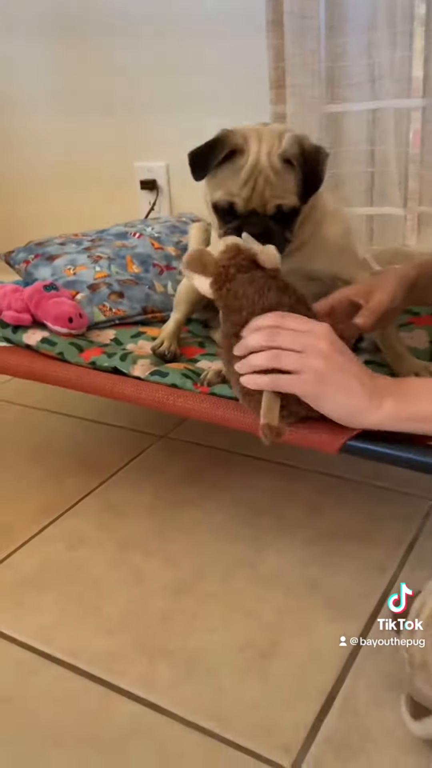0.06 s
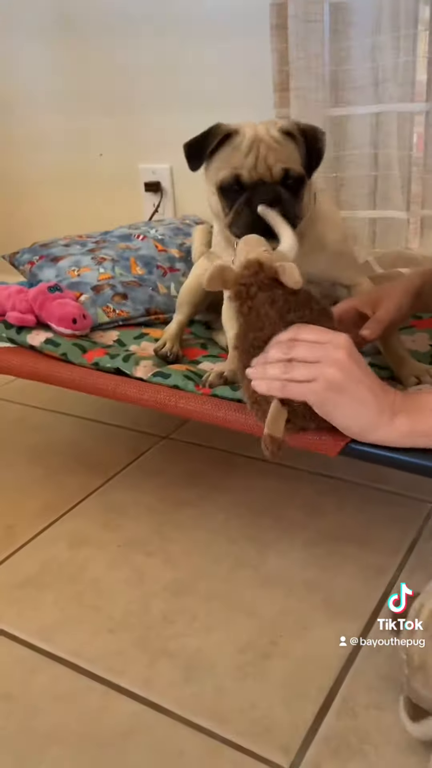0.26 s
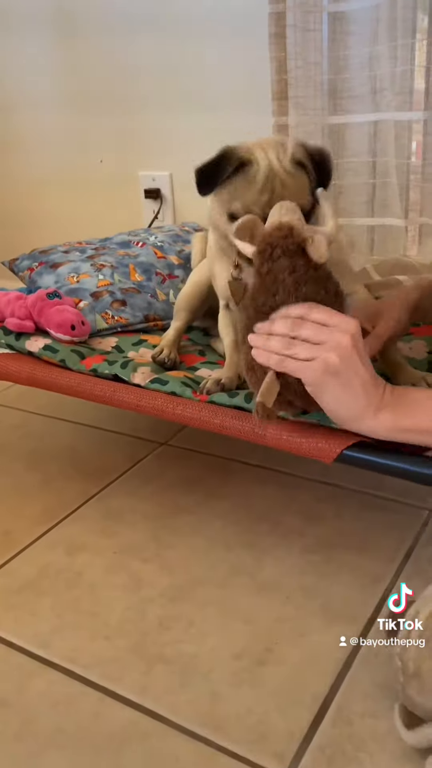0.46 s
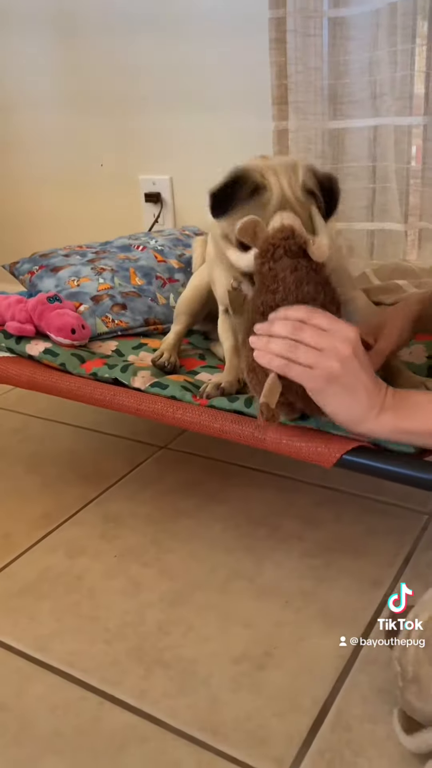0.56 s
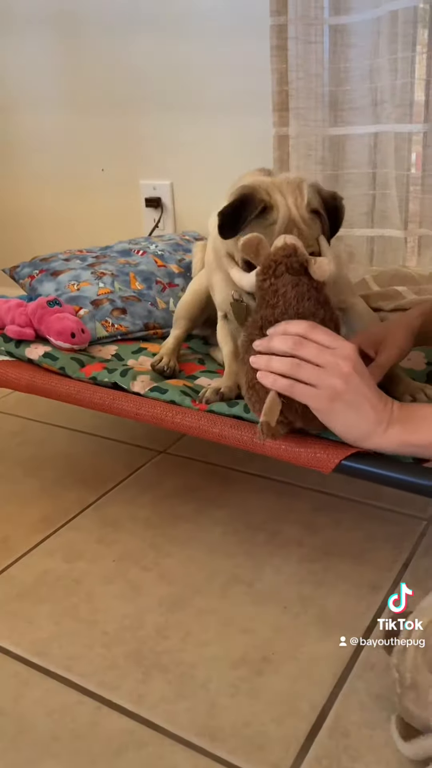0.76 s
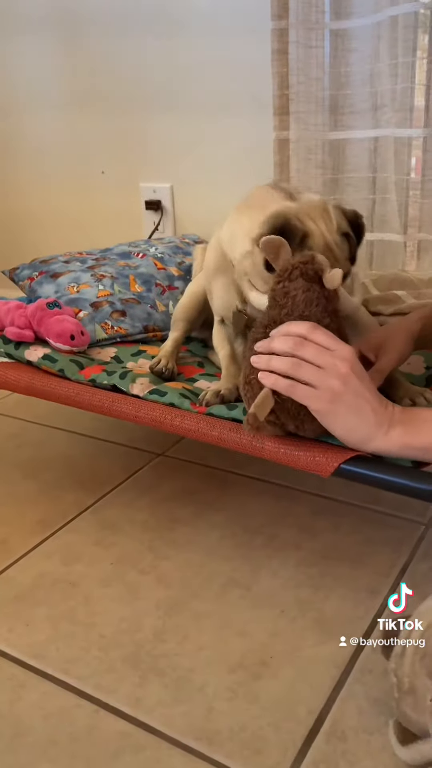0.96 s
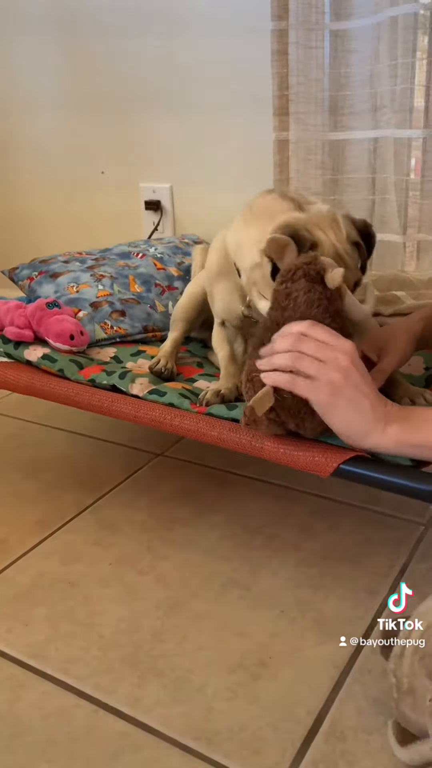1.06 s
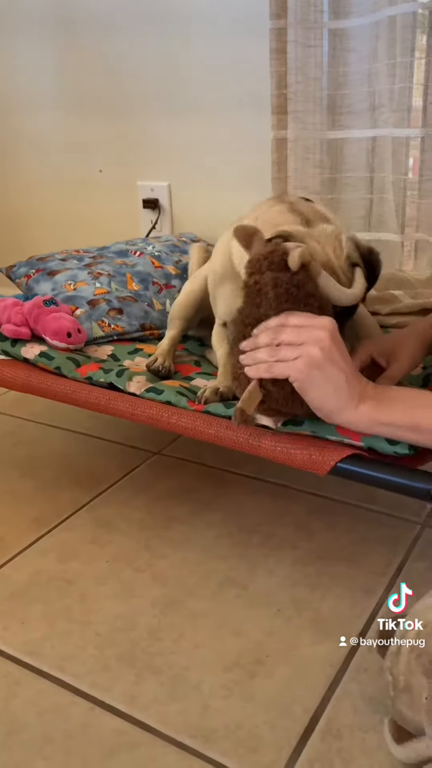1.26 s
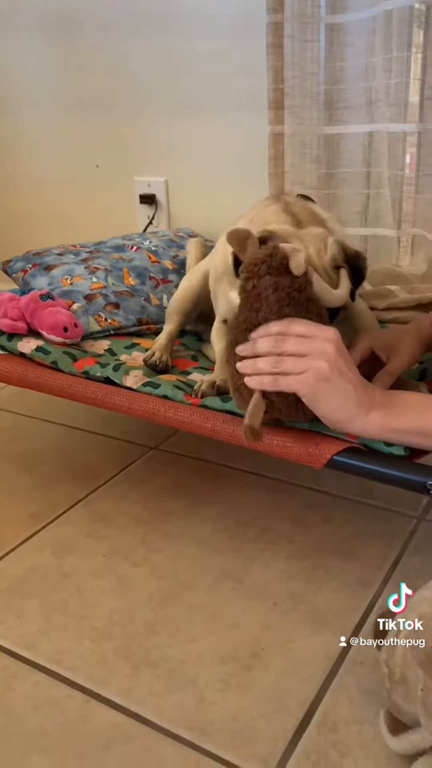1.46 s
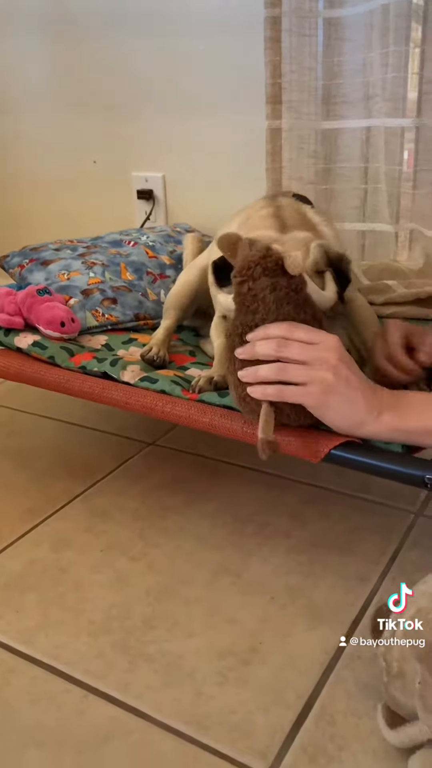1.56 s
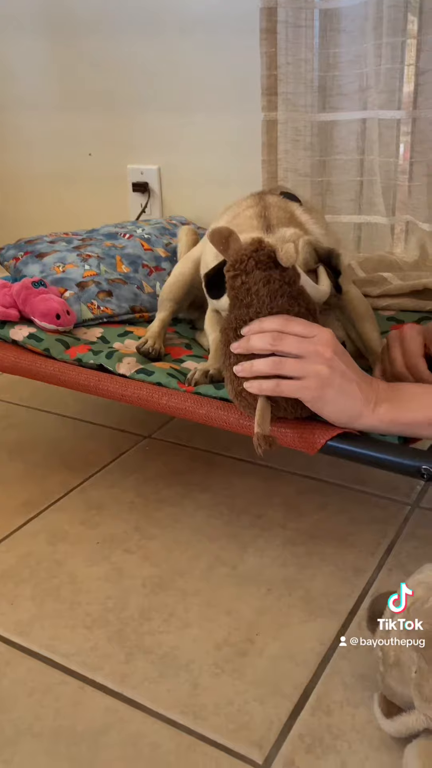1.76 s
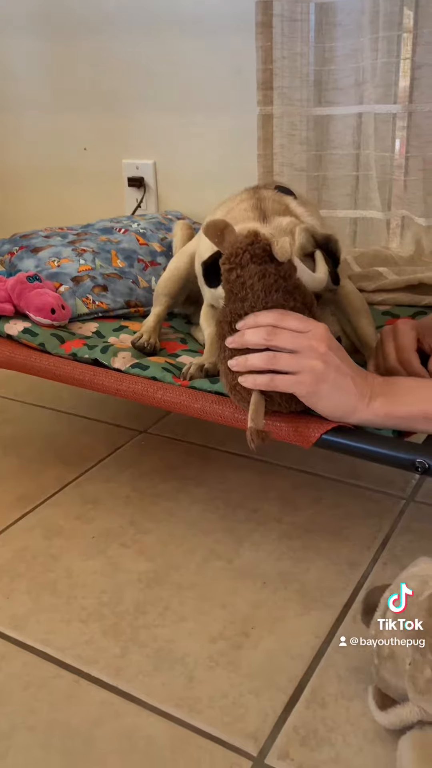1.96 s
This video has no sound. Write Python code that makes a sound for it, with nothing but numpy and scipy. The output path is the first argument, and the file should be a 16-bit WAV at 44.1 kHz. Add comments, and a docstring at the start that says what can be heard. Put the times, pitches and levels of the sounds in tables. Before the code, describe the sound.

A plush squeaky toy is squeezed nearby in a tiled room. A faint hiss of air leads to a short, bright squeak at about 0.25 seconds, rising then sagging. Near 0.6 seconds the squeaker refills with a tiny chirp and soft pop. A second squeak comes at 1.1 seconds, then faint air and a soft knock around 1.6. Quiet fabric rustles and dull nudges sit over a low hum.

```python
"""A plush dog toy squeezed in a tiled room

A hand squeezes the toy over a dog's cot, about a metre away. Air hisses through the squeaker, then
drives its reed: two bright squeaks that rise and sag in pitch, and a tiny chirp as the bulb refills.
The elastic bulb pops back with a soft knock. Fabric rustles and the cot is nudged over a low hum."""
import sys
import numpy as np
from scipy import signal
from scipy.fft import rfft, irfft
from scipy.io import wavfile

SR = 44100
rng = np.random.default_rng(int(sys.argv[2]) if len(sys.argv) > 2 else 0)


def to_wav(sig):
    """Store sig (one row per channel, or 1-D mono) as 16-bit WAV at the path in sys.argv[1].

    Samples outside -1..1 are clipped; the rate is SR.
    """
    pcm = np.clip(np.atleast_2d(sig), -1, 1) * 32767
    pcm = np.round(pcm).astype(np.int16)
    wavfile.write(sys.argv[1], SR, pcm.T)  # frames by channels


N = 88200
T = np.arange(N) / SR
LEFT_RIGHT = np.array([[1], [-1]])

# Spectrum of the quiet house: f/Hz, level/dB
HOUSE_SPECTRUM = [(25, -22), (70, -5), (130, -5), (220, -17.5), (600, -30), (1500, -44), (5000, -41.5),
                  (15000, -46.5)]
# Course of the rumble: t/s, level/dB
RUMBLE_LEVELS = [(0, -100), (.3, -79), (.6, -73), (.9, -66), (1.08, -60.5), (1.3, -74), (1.45, -60),
                 (1.65, -66), (2, -57.5)]
# Course of the hum: t/s, f/Hz, level/dB
HUM_CURVE = [(.03, 93.5, -88), (.1, 100.5, -64.5), (.32, 99.2, -58.5), (.52, 101.6, -58), (.6, 95.1, -68.5),
             (.82, 96.4, -71.5), (.88, 95.8, -60), (1.13, 100.1, -60.5), (1.2, 98.7, -66.5),
             (1.27, 108, -63), (1.38, 84.3, -60), (1.46, 85.4, -64), (1.7, 82, -63), (2, 69.7, -69.5)]
# Nudges of the cot: start/s, attack/s, hold/s, release/s, level/dB, f/Hz
COT_NUDGES = [(0.611, 0.01, 0.093, .14, -55.5, 147.4), (0.734, 0.013, 0.016, .08, -54.5, 98),
              (0.942, 0.009, 0.19, .2, -58, 95), (1.638, 0.021, 0.244, .3, -65, 139.6)]
# Rubs of plush on bedding, and the fingers' grip: start/s, attack/s, hold/s, release/s, level/dB
FABRIC_RUBS = [(.24, 0.018, .04, .08, -69.5), (.62, 0.03, 0.069, .12, -55.5),
               (0.928, 0.018, 0.063, 0.16, -58.5), (1.14, 0.023, 0.13, 0.34, -64.5),
               (1.42, .04, .1, 0.19, -65.5), (1.64, 0.024, 0.046, 0.11, -64)]
FINGER_GRIP = (.051, .002, .015, .2, -65)
# Their friction spectra: f/Hz, level/dB
RUB_SPECTRUM = [(60, -7), (150, 4), (300, 2), (700, -9.5), (1100, -27), (2500, -33), (5000, -33.5),
                (14000, -44)]
GRIP_SPECTRUM = [(150, -6), (500, -5), (850, 4), (1200, -3), (2000, -15), (2800, -9), (5000, -21.5),
                 (14000, -35)]
# The bulb pops back: t/s, level/dB
BULB_POPS = [(0.5732, -35.5), (1.5796, -32.5)]
# Modes of the bulb in its stuffing: f/Hz, level before filtering/dB, T60/s
BULB_MODES = [(287, -9.5, 0.057), (520, -16, .025), (820, -13.5, 0.03), (1112, 10, 0.0067),
              (1130, -11.5, 0.006)]
# Airflow through the squeaker: start/s, attack/s, hold/s, release/s, level/dB
AIR_PUFFS = [(0.054, 0.036, 0.26, 0.023, -57), (1.42, 0.01, 0.019, 0.21, -64),
             (1.553, .01, 0.038, 0.15, -74)]
# The reed snaps open: t/s, level/dB
REED_SNAPS = [(0.2365, -28.5), (1.0924, -28)]
# Spectra of the airflow and the snaps: f/Hz, level/dB
AIR_SPECTRUM = [(300, -22.5), (1100, -6.5), (1700, -1.5), (2500, -8), (4500, 4), (5900, -5.5), (7500, 1),
                (9500, -1), (12000, -7.5), (14500, -4), (16000, -17)]
SNAP_SPECTRUM = [(300, -33), (900, -15.5), (1700, 2.5), (3000, -12), (5500, -7.5), (8000, 1), (11000, -12),
                 (15000, -16)]
# Course of the reed in each squeak and in the refill chirp: t/s, f/Hz, level/dB
SQUEAK_CURVES = [
    [(.227, 1224, -42.5), (.236, 1220, -32.5), (.2374, 1224, -18), (.246, 1258, -17.5), (.256, 1361, -15),
     (.263, 1477, -19), (.272, 1455, -15.5), (.278, 1163, -21.5), (.29, 1079, -26.5), (.298, 979, -42)],
    [(1.082, 1205, -51), (1.0908, 1210, -31.5), (1.0928, 1209, -21), (1.103, 1233, -19.5),
     (1.114, 1273, -18), (1.125, 1246, -20), (1.136, 1155, -20), (1.151, 1118, -22.5), (1.157, 1014, -34.5),
     (1.163, 948, -50.5)],
]
CHIRP_CURVE = [(.563, 929.2, -59), (.5722, 945.5, -43), (.5738, 1062, -26.5), (.579, 961, -30),
               (.581, 871, -43.5)]
# Reed spectra through the plush, blown out (one per squeak) and sucked in: f/Hz, level/dB
BLOWN_SPECTRA = [
    [(500, -31.5), (950, -4), (1200, -8.5), (1500, -9), (1800, -15), (2600, -12), (3700, -13), (4900, -11),
     (6200, -8.5), (7400, -1), (8700, -4), (9800, -12), (11500, -46.5), (14300, -29), (16000, -47)],
    [(500, -40.5), (950, -5.5), (1170, -4), (1500, -13), (2450, -11.5), (3700, -13.5), (4950, -9),
     (6200, -10.5), (7400, -1.5), (8700, -1.5), (9800, -10), (11500, -35.5), (14300, -22.5), (16000, -41)],
]
SUCKED_SPECTRUM = [(500, -14.5), (1000, -4), (2050, -7.5), (3100, -14), (4500, -14), (6200, -25),
                   (7400, -8), (8400, 0), (10000, -5.5), (12000, -19), (15000, -19.5)]
# Reverberation by band: f/Hz, T60/s, level/dB, left-right coherence (0-1)
ROOM_BANDS = [(154, 0.61, -5.5, .9), (613.2, 0.17, -0.5, 1), (1250, 0.5, -2, 0.4), (2500, 0.54, -0.5, 0.6),
              (4780, 0.42, -1, 0), (6700, 0.37, -3.5, 1), (8957, 0.33, -9, .95), (13400, .31, -9.5, 1)]
# Phase between the two microphone ports: f/Hz, lead of the left/rad
PORT_PHASES = [(400, 0), (1200, -.9), (2700, .4), (4900, 3.2), (6200, 4.0), (7400, 5.4), (8600, 6.25),
               (9900, 7.3), (12000, 9.5), (14000, 11.8)]


def undb(db):
    """Amplitude ratio of a level in decibels."""
    return 10 ** (np.asarray(db) / 20)


def unit(x):
    """Normalisation to an rms of 1."""
    return x / np.sqrt(np.mean(x ** 2))


def on_log(hz, points):
    """Interpolation of (f/Hz, value) points on a logarithmic frequency axis."""
    f, values = np.array(points).T
    return np.interp(np.log(hz + 1e-9), np.log(f), values)


def noise(spectrum):
    """Spectral shaping of white noise, at unit rms."""
    gain = undb(on_log(np.fft.rfftfreq(N, 1 / SR), spectrum))
    return unit(irfft(rfft(rng.standard_normal(N)) * gain, N))


def ringing_noise(hz, width_hz):
    """Response of one steep resonance to random forcing."""
    detuning = (np.fft.rfftfreq(N, 1 / SR) - hz) / width_hz
    return unit(irfft(rfft(rng.standard_normal(N)) / (1 + (2 * detuning) ** 2), N))


def wander(rate_hz):
    """Random modulation: interpolated Gaussian values with a spread near 1."""
    return 1.2 * np.interp(T * rate_hz, np.arange(N), rng.standard_normal(N))


def decay(age, t60):
    """Exponential damping by 60 dB in each t60."""
    return np.exp(-np.log(1000) * age / t60)


def swell(start, attack, hold, release, db):
    """Envelope with a linear attack, a hold and an exponential release."""
    since_hold = np.maximum(T - start - attack - hold, 0)
    return undb(db) * np.clip((T - start) / attack, 0, 1) * decay(since_hold, release)


def house():
    """Partly coherent background noise: a common part plus a weaker part in antiphase."""
    return undb(-68.5) * (noise(HOUSE_SPECTRUM) + 0.39 * noise(HOUSE_SPECTRUM) * LEFT_RIGHT)


def rumble(centre_hz=49, spread_hz=3):
    """Random frequency and amplitude modulation spread a deep tone into a narrow band."""
    phase = 2 * np.pi * np.cumsum(centre_hz + spread_hz * wander(35)) / SR
    level_db = np.interp(T, *np.array(RUMBLE_LEVELS).T) + 1.5 * wander(10)
    return np.sqrt(2) * np.sin(phase) * undb(level_db)


def hum():
    """Slow modulation makes a low sinusoid waver in pitch and level."""
    times, hz, db = np.array(HUM_CURVE).T
    pitch = np.interp(T, times, hz) * (1 + 0.0099 * wander(4.7))
    phase = 2 * np.pi * np.cumsum(pitch) / SR
    return np.sqrt(2) * np.sin(phase) * undb(np.interp(T, times, db) + 3.5 * wander(12))


def cot():
    """Forced vibration: each nudge excites one dull resonance of the cot."""
    return sum(swell(*envelope) * ringing_noise(hz, width_hz=47) for *envelope, hz in COT_NUDGES)


def fabric():
    """Uneven friction of plush on bedding and of fingers on plush radiates noise."""
    rubs = noise(RUB_SPECTRUM) * sum(swell(*rub) for rub in FABRIC_RUBS)
    grip = noise(GRIP_SPECTRUM) * swell(*FINGER_GRIP)
    return (rubs + grip) * undb(2.5 * wander(44))


def bulb(contact_s=0.00095, low_cut_hz=173):
    """The bulb springs back and rings in damped modes; a high-pass filter keeps deep bass out of the knock."""
    ring = np.zeros(N)
    for start, db in BULB_POPS:
        age = np.maximum(T - start, 0)
        for hz, mode_db, t60 in BULB_MODES:
            ring += undb(db + mode_db) * np.sin(2 * np.pi * hz * age) * decay(age, t60)
    lag = np.arange(-176, 177) / SR
    push = np.exp(-(4 * lag / contact_s) ** 2)  # the stuffing softens the knock
    knock = np.convolve(ring, push / push.sum(), "same")
    return signal.sosfilt(signal.butter(2, low_cut_hz, "high", fs=SR, output="sos"), knock)


def hiss():
    """Airflow through the squeaker makes broadband noise."""
    return noise(AIR_SPECTRUM) * sum(swell(*puff) for puff in AIR_PUFFS)


def snaps(t60=0.015):
    """Onset transients: the reed snaps open with a short burst of noise."""
    return noise(SNAP_SPECTRUM) * sum(swell(start, .0004, 0, t60, db) for start, db in REED_SNAPS)


def reed(curve, spectrum, air_db, harmonics=14, jitter=.0016, shimmer_db=1):
    """Source and filter: the reed slaps once a cycle; its harmonics slide through fixed resonances."""
    times, hz, db = np.array(curve).T
    pitch = np.interp(T, times, hz) * (1 + jitter * wander(1100))
    phase = 2 * np.pi * np.cumsum(pitch) / SR
    effort_db = np.interp(T, times, db)
    sounding = (T > times[0]) & (T < times[-1])
    k = np.arange(1, harmonics + 1)[:, None]
    partial_hz = k * pitch[sounding]
    # The treble weakens as the blowing pressure falls below its peak.
    dulling_db = 0.58 * (effort_db[sounding] - db.max()) * np.minimum(partial_hz / 6000, 1)
    gains = undb(on_log(partial_hz, spectrum) + dulling_db) * (partial_hz < SR / 2)
    dispersion_rad = 0.23 * k ** 2  # the bore delays the upper harmonics
    tone = np.zeros(N)
    tone[sounding] = unit(np.sum(gains * np.sin(k * phase[sounding] - dispersion_rad), axis=0))
    pulsed_air = undb(air_db) * noise(spectrum) * (1 + np.cos(phase))
    return (tone + pulsed_air) * sounding * undb(effort_db + shimmer_db * wander(300))


def squeaker(squeak_air_db=(-36.5, -42)):
    """Flow drives the reed both ways: outflow gives two squeaks, inflow an airy chirp."""
    squeaks = sum(reed(*squeak) for squeak in zip(SQUEAK_CURVES, BLOWN_SPECTRA, squeak_air_db))
    return squeaks + reed(CHIRP_CURVE, SUCKED_SPECTRUM, air_db=-14.5)


def room(source, gap_s=0.0013, build_s=0.0099, early_db=4, early_s=0.019):
    """Reflection from tiles and bare walls: strong early sound, then a tail decaying band by band."""
    f = np.fft.rfftfreq(N, 1 / SR)
    centres_hz = [band[0] for band in ROOM_BANDS]
    mid, side = rfft(rng.standard_normal((2, N)))
    onset = np.clip((T - gap_s) / build_s, 0, 1) * (1 + undb(early_db) * np.exp(-T / early_s))
    response = 0
    for selector, (_, t60, db, coherence) in zip(np.eye(len(ROOM_BANDS)), ROOM_BANDS):
        band_gain = on_log(f, list(zip(centres_hz, selector)))
        pair = np.sqrt((1 + coherence) / 2) * mid + np.sqrt((1 - coherence) / 2) * side * LEFT_RIGHT
        fade = onset * decay(T, t60)
        response += undb(db) * irfft(pair * band_gain, N) * fade / np.linalg.norm(fade)
    return signal.fftconvolve(source[None], response, axes=1)[:, :N]


def ports(pair):
    """Phase difference: the sound reaches two microphone ports out of step."""
    lead_rad = np.interp(np.fft.rfftfreq(2 * N, 1 / SR), *np.array(PORT_PHASES).T)
    return irfft(rfft(pair, 2 * N) * np.exp(.5j * lead_rad * LEFT_RIGHT))[:, :N]


def scene(bass_left_db=5.5):
    """Superposition of the quiet house, the bass a little to the left, and the toy with its echoes."""
    toy = hiss() + snaps() + squeaker() + bulb() + fabric()
    quiet = house()
    toy_in_room = ports(toy + room(toy))
    bass = (cot() + hum() + rumble()) * undb(LEFT_RIGHT * bass_left_db / 2)
    return quiet + bass + toy_in_room


def record(dry):
    """Band limiting: a steep low-pass filter cuts the treble above 16 kHz."""
    return signal.sosfilt(signal.ellip(8, .2, 70, 16000, fs=SR, output="sos"), dry)


dry = scene()
out = record(dry)
to_wav(out)
```